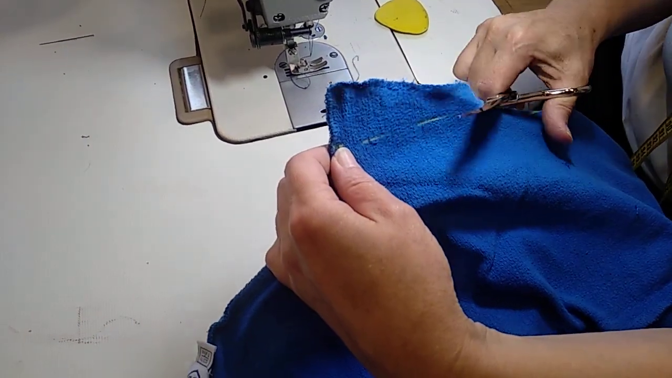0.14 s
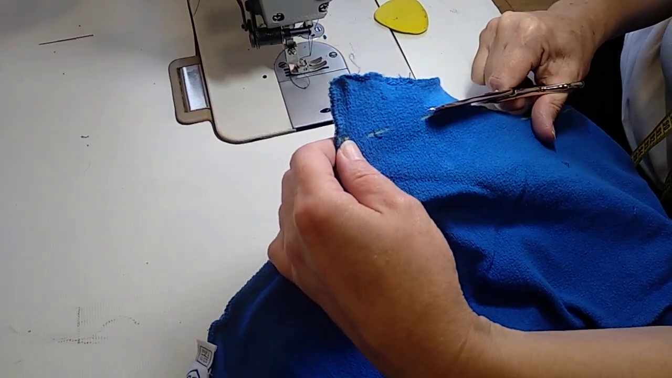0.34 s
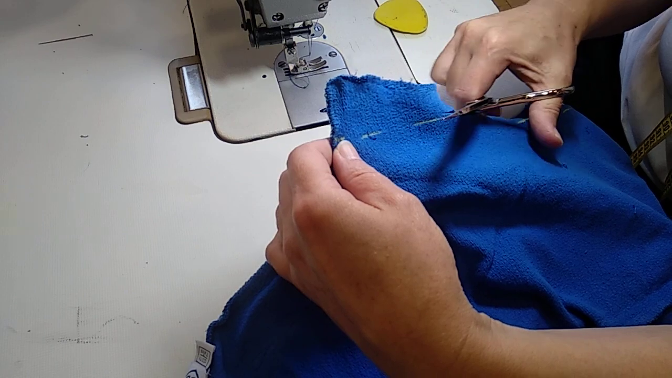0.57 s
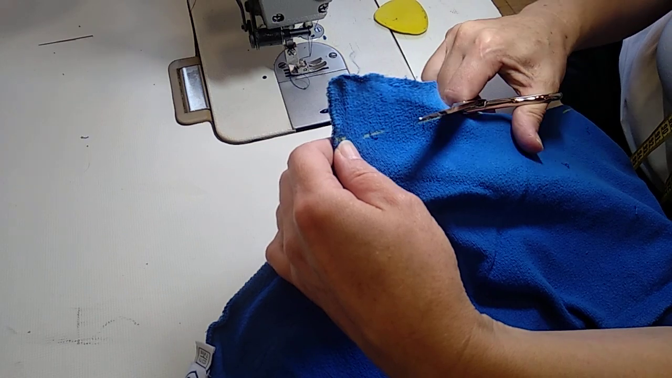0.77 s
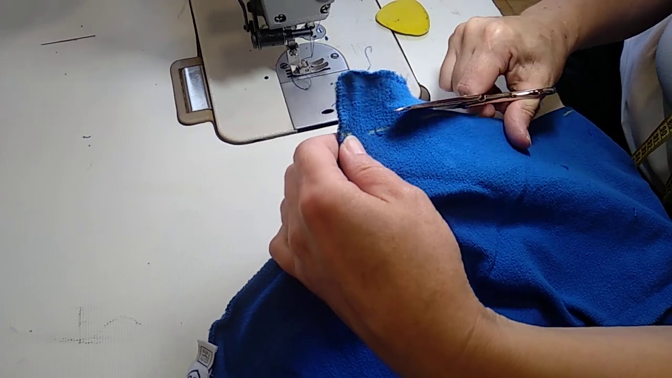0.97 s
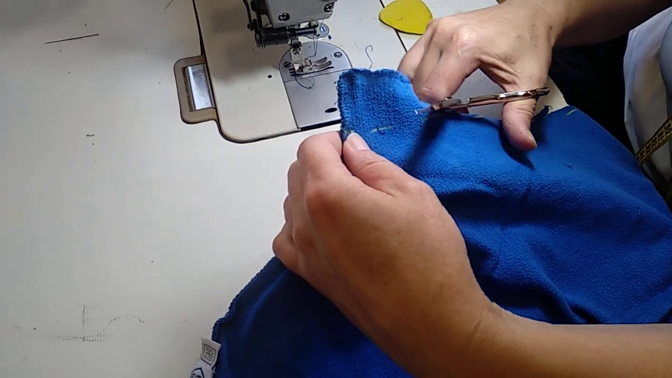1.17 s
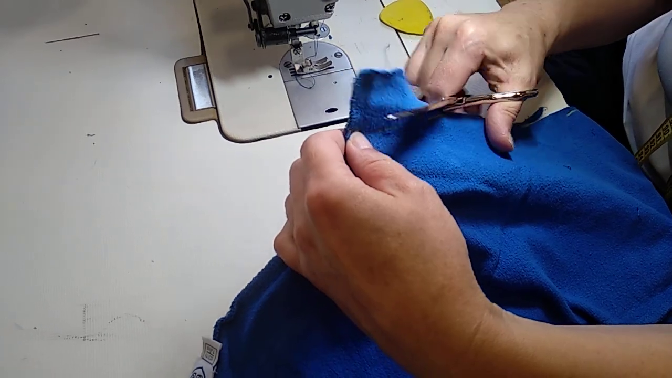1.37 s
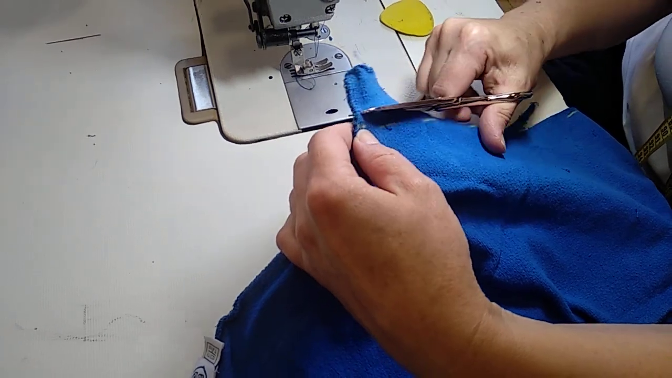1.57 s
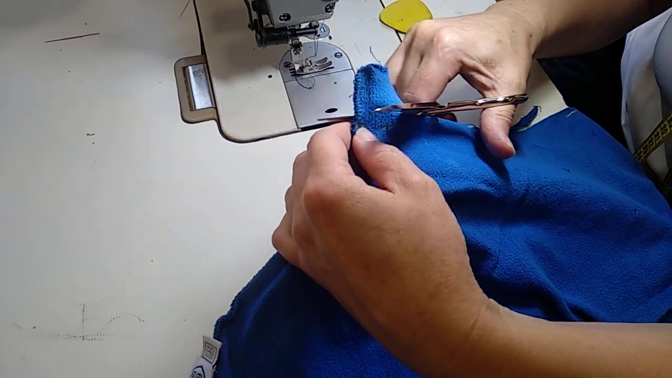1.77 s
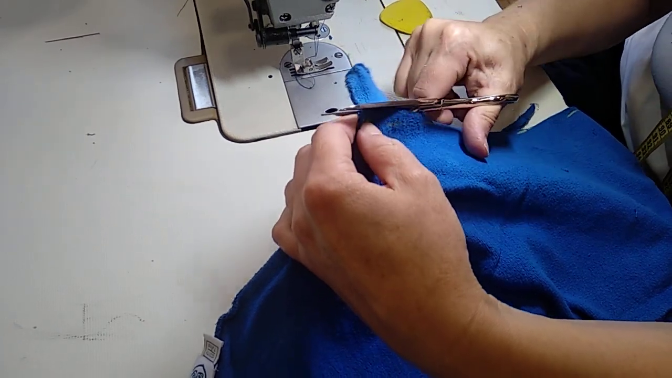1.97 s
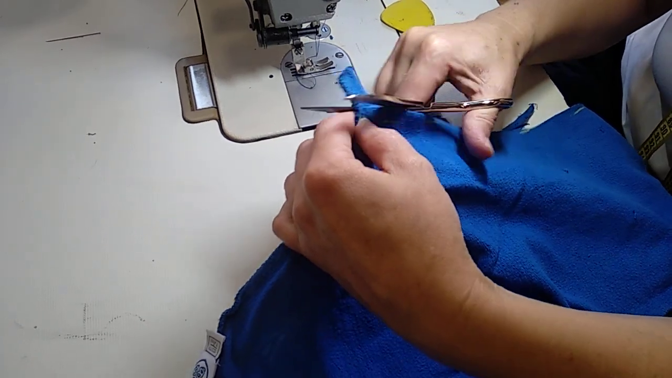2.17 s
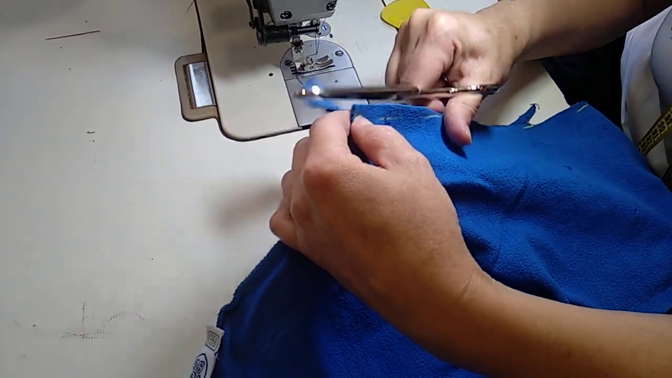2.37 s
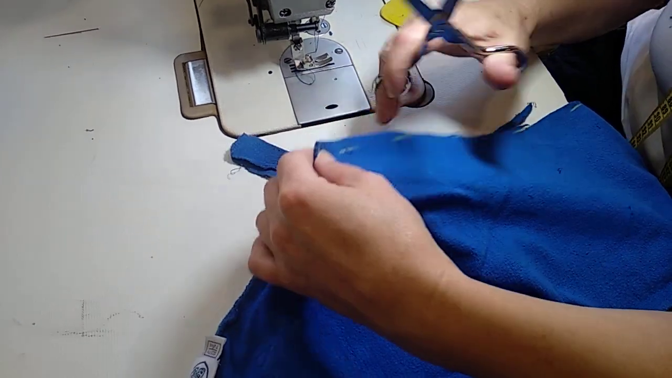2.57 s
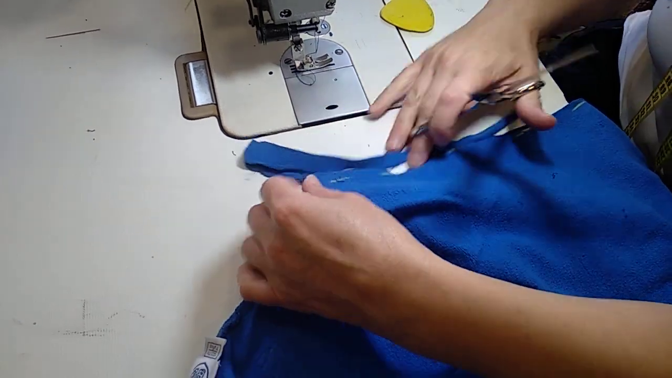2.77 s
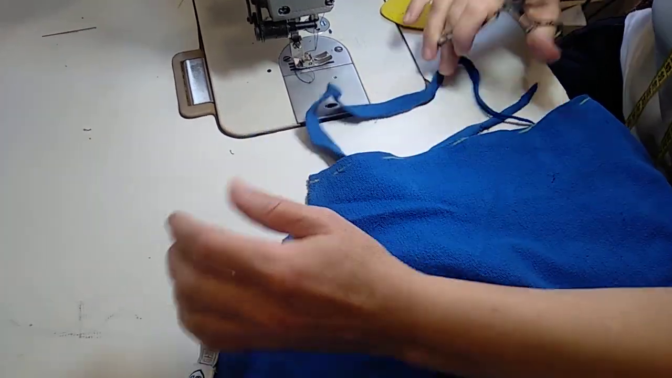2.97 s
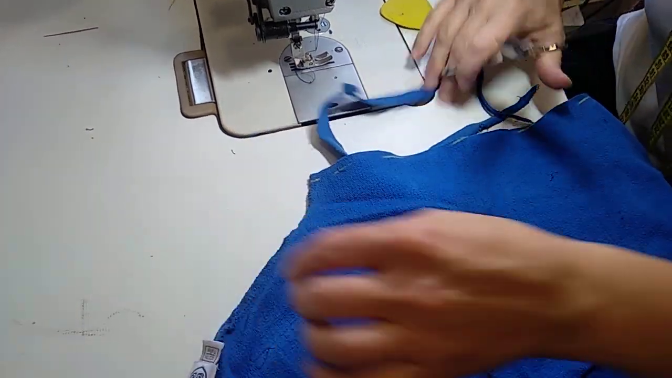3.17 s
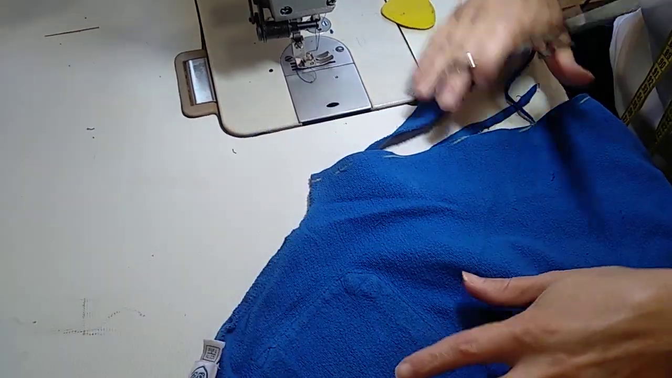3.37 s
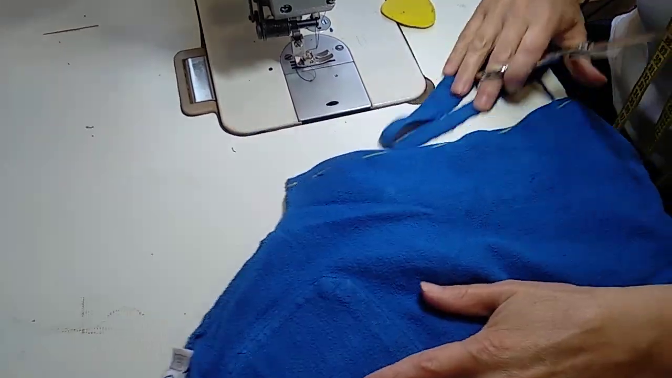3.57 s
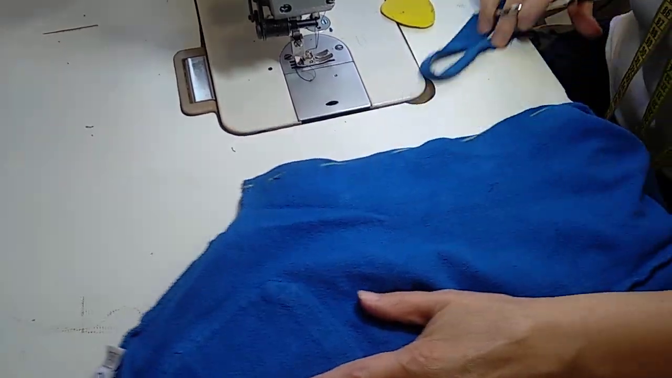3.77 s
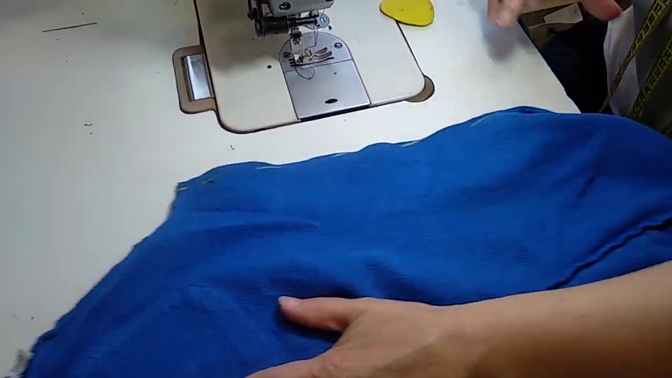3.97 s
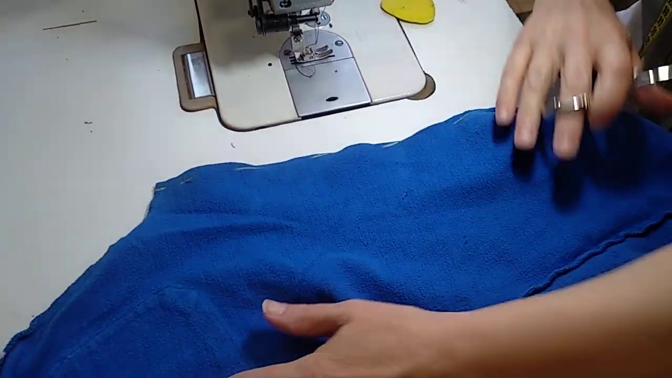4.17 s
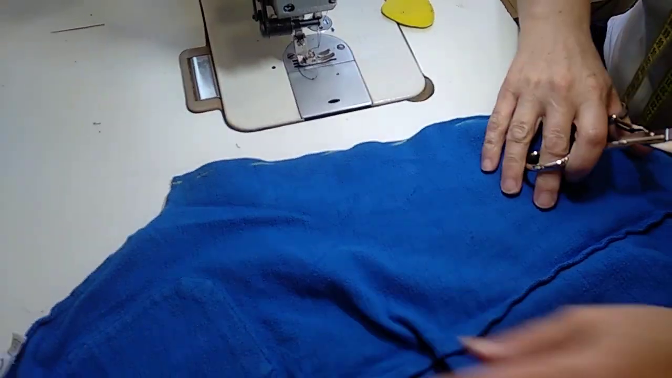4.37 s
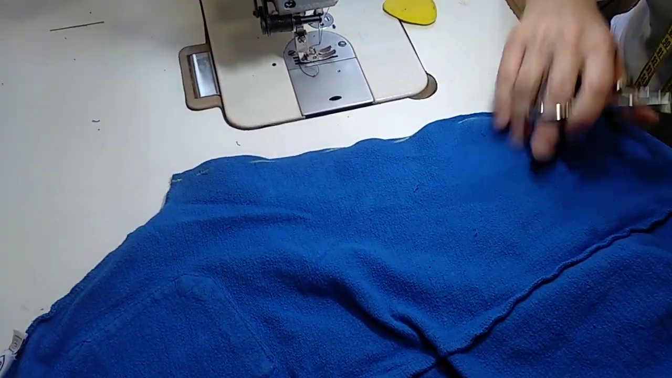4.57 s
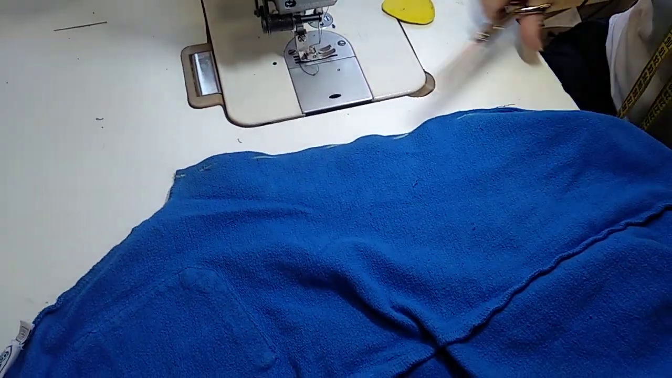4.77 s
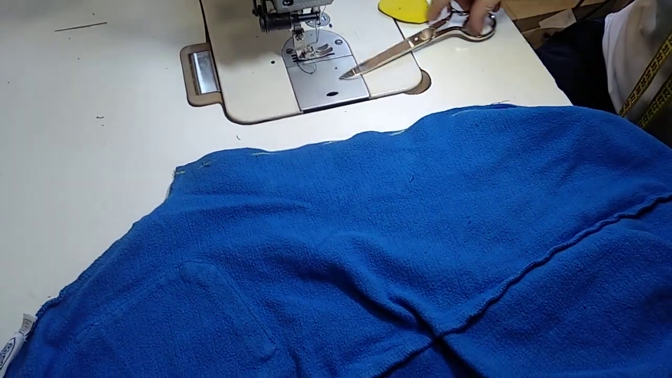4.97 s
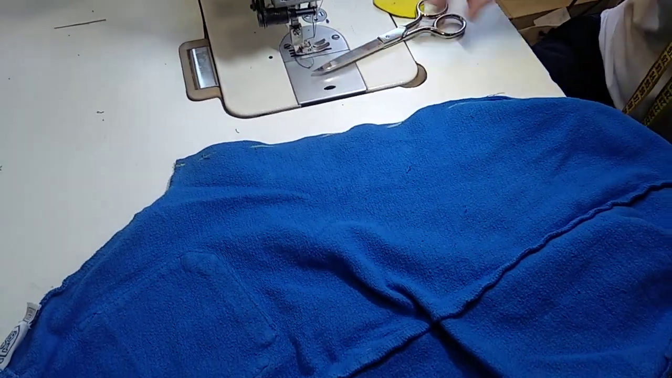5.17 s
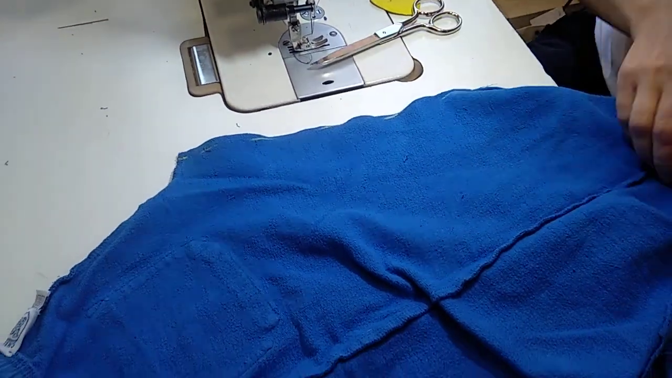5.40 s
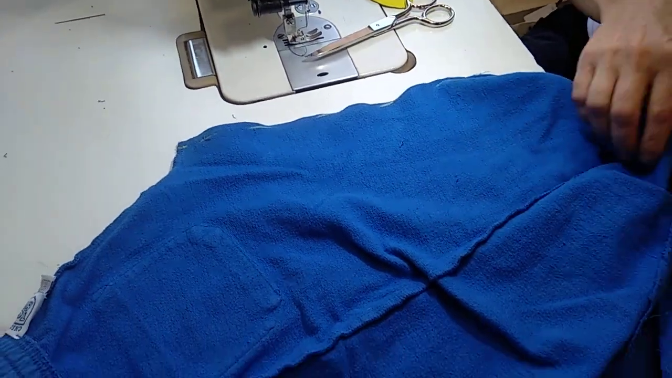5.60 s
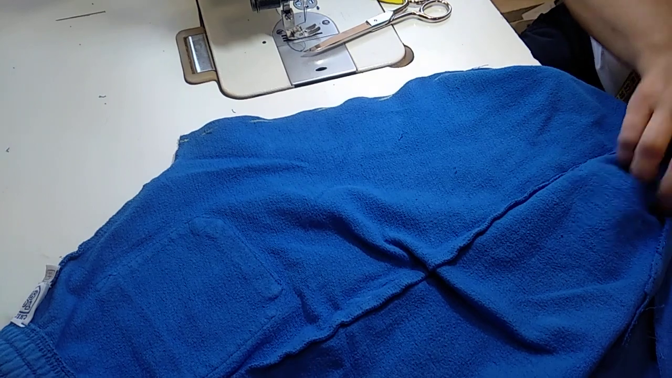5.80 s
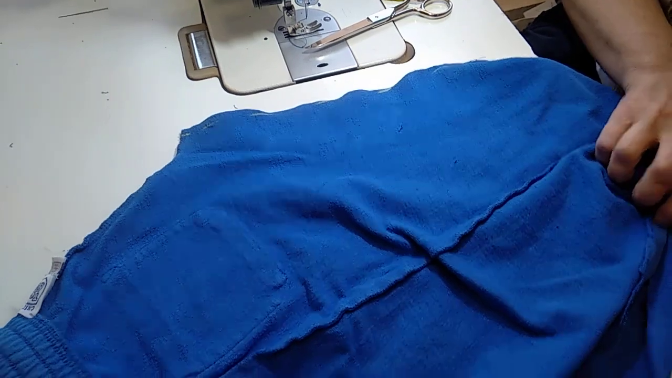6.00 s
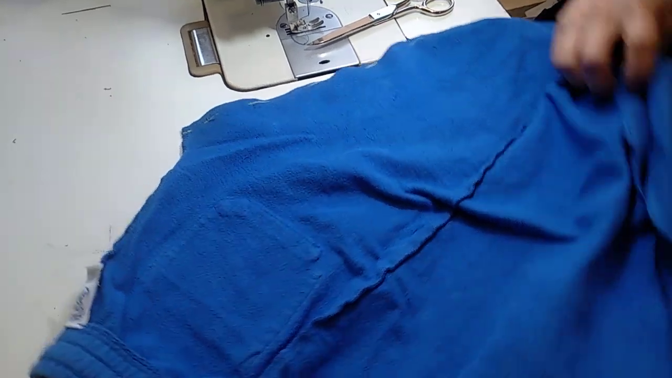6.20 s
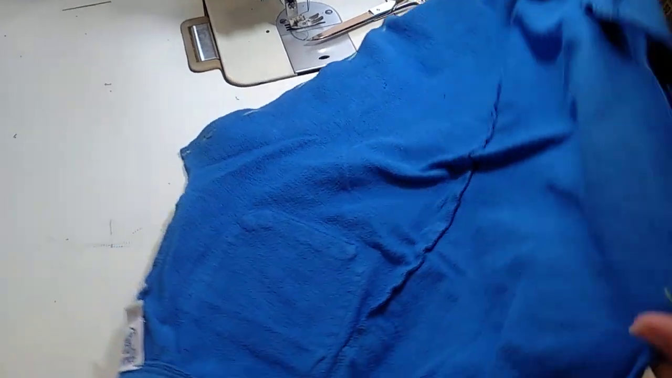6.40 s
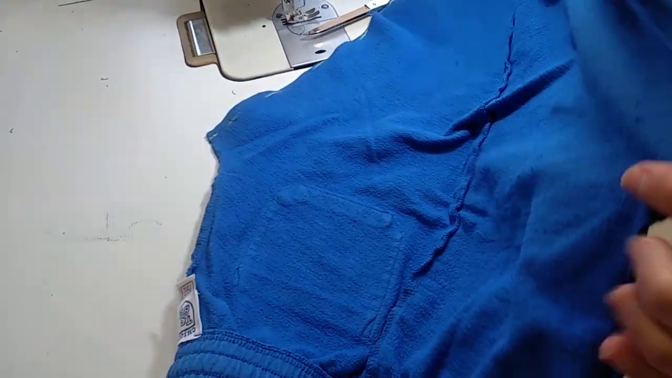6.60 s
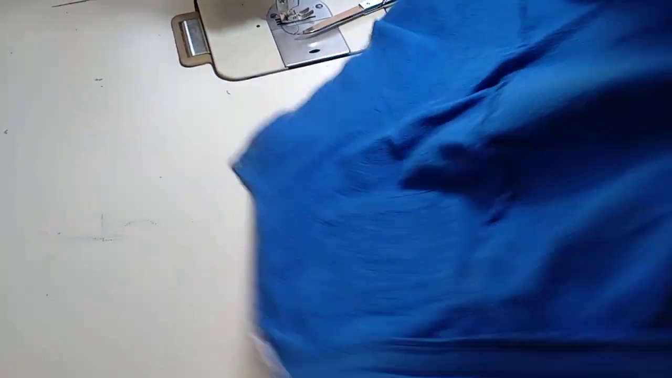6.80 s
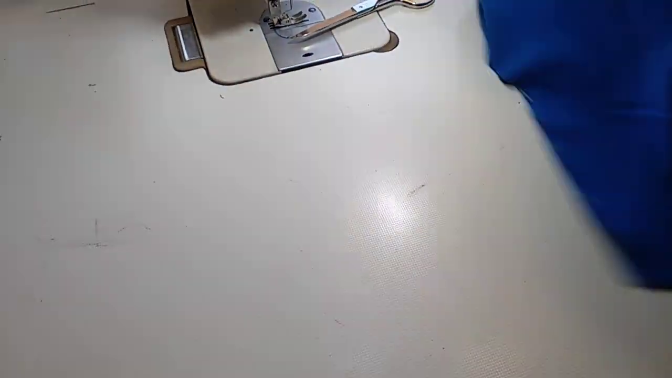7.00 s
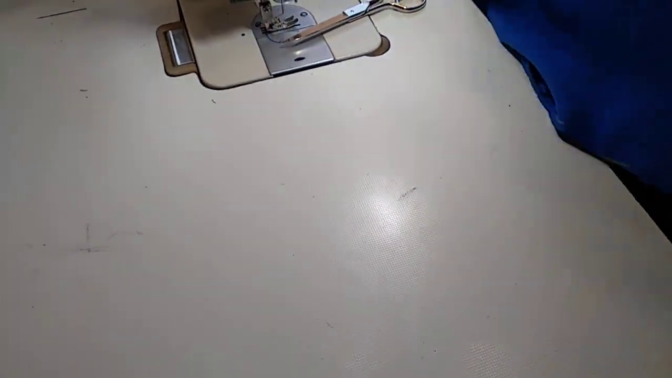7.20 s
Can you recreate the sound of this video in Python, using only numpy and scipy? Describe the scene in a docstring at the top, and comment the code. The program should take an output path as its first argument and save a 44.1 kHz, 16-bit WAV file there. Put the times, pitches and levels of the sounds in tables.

```python
"""A quiet workroom hums while small steel scissors cut a knitted edge in four crunchy strokes on a sewing table.
They click and snap; cloth slides and swishes, a hand thumps, and the scissors land and bounce on a bed plate.
Steel, plate and table are resonant modes driven by tiny impacts or noise; cloth and hum are noise in bands.
Two close microphone ports hear the treble apart and the middle alike; a faint room echo follows."""
import sys
import numpy as np
from scipy import signal
from scipy.io import wavfile

SR = 44100
rng = np.random.default_rng(int(sys.argv[2]) if len(sys.argv) > 2 else 0)


def master(y):
    """Save y as 16-bit WAV."""
    cut = np.clip(np.atleast_2d(y).T, -1, 1)
    pcm = np.round(cut * 32767)  # scale
    wavfile.write(sys.argv[1], SR, pcm.astype(np.int16))


N = 319708   # samples

# likeness of the two ports for near sources: (frequency [Hz], likeness setting, 1 = alike)
NEAR_ALIKE = [(100, 1), (1000, .999), (4000, .999), (5000, 0.2), (8000, 0.12), (15000, 0.085)]
# lean of near sources: (frequency [Hz], left minus right gain [dB])
NEAR_LEAN = [(100, 0), (600, 0), (3500, 0), (16000, -.3)]
NEAR_PORTS = (NEAR_ALIKE, NEAR_LEAN)
# scissors landing and bouncing on the bed plate: (onset [s], drive of tips [dB], place from pivot 0 to tip 1,
# drive of roots [dB], of shanks [dB], of handles [dB], of bed plate [dB], swell [s], t60 [s])
KNOCKS = [(4.921, -23, 1, -57.5, -38.5, -36, -40, 0.0074, 0.0097),
          (4.932, -29.5, 1, -60, -50, -46.5, -45, 0.0063, 0.065),
          (4.95, -41.5, 0.9, -59.5, -57.5, -51, -48.5, 0.007, 0.36),
          (5.035, -53.5, 0.85, -58.5, -49.5, -50.5, -47.5, 0.01, 0.69),
          (5.086, -25.5, 0.36, -37.5, -35.5, -30.5, -32.5, 0.013, 0.076),
          (5.114, -37.5, 0.72, -49, -59, -60.5, -54, 0.01, 0.044),
          (5.137, -50, 0.14, -47.5, -44.5, -38.5, -34, 0.0098, 0.13),
          (5.182, -56.5, 0.039, -52, -54, -40.5, -46, 0.0084, 0.054),
          (5.219, -65, 0.092, -66.5, -65, -54, -50.5, 0.013, .05),
          (5.248, -69.5, 0.29, -70.5, -69, -50.5, -46.5, 0.014, 0.13),
          (5.292, -97, 0.12, -87, -71, -56, -49, 0.0065, 0.15)]


def amp(db):
    """Logarithmic level: the amplitude gain of a level in dB."""
    return 10 ** (np.asarray(db) / 20)


def rms_one(x):
    """Power normalisation: scales a signal to rms 1."""
    return x / np.sqrt(np.mean(x ** 2) + 1e-20)


def at_hz(points, hz):
    """Interpolation along log frequency: reads a table at a given pitch."""
    table = np.array(points)
    return np.interp(np.log(hz), np.log(table[:, 0]), table[:, 1])


def waver(*speeds):
    """Random modulation: low-passed noise moves a gain; each speed is (rms spread [dB], corner rate [Hz])."""
    step, settle = 40, 2000   # samples between drift values; drift values dropped while the filter settles
    level_db = np.zeros(N // step + 2)
    for spread_db, rate_hz in speeds:
        r = np.exp(-2 * np.pi * rate_hz * step / SR)
        noise = rng.standard_normal(len(level_db) + settle)
        drift = signal.lfilter([1], [1, -2 * r, r * r], noise)[settle:]
        level_db += spread_db * rms_one(drift)
    return np.interp(np.arange(N) / step, np.arange(len(level_db)), amp(level_db))


def swells(starts, levels_db, swell_s, t60_s):
    """Onset and decay: each event swells as a bell curve and falls into a tail; one envelope per row of levels."""
    levels_db = np.atleast_2d(levels_db)
    lead_s = .04   # the bell is drawn from this long before the onset
    out = np.zeros((len(levels_db), N))
    for s, level_db, swell, t60 in zip(starts, levels_db.T, swell_s + 0 * starts, t60_s + 0 * starts):
        start = round((s - lead_s) * SR)
        t = np.arange(min(N - start, SR // 2)) / SR - lead_s - swell   # 0 at the peak
        bell = np.exp(-(t / swell) ** 2)
        tail = amp(-60 * np.maximum(t, 0) / t60)
        shape = np.where(t < 0, bell, .6 * bell + .4 * tail)
        out[:, start:start + len(t)] += amp(level_db)[:, None] * shape
    return out


def held(times, levels_db, rise_s, fall_s):
    """Sustained excitation: a gain passes through the levels, with bell-shaped flanks before and after."""
    t = np.arange(N) / SR
    before = np.maximum(times[0] - t, 0) / rise_s
    after = np.maximum(t - times[-1], 0) / fall_s
    return amp(np.interp(t, times, levels_db)) * np.exp(-(before + after) ** 2)


def spread(mid, side, ports, hz):
    """Mid-side stereo: shared and opposed signals mix to the likeness and lean set for this pitch."""
    alike_table, lean_table = ports
    alike = np.clip(at_hz(alike_table, hz), -1, 1)
    left_db = at_hz(lean_table, hz)
    mix = np.array([[1, 0.66], [1, -0.92]]) * np.sqrt([(1 + alike) / 2, (1 - alike) / 2])
    return mix * amp([[left_db / 2], [-left_db / 2]]) @ np.array([mid, side])


def banded_noise(spectrum, ports, band_gain, size=N):
    """Subband synthesis: half-octave noise bands, each with its level, likeness and gain in time; rms 1."""
    out, edges = 0, 25 * 2 ** np.arange(0, 9.6, .5)
    white = rng.standard_normal((2, 2, size))   # neighbouring bands get unrelated noise
    for k, (low, high) in enumerate(zip(edges, edges[1:])):
        hz = np.sqrt(low * high)
        if spectrum[0][0] / 1.5 < hz < spectrum[-1][0] * 1.5:
            band = signal.butter(2, [low, high], "band", fs=SR, output="sos")
            mid, side = signal.sosfilt(band, white[k % 2])
            out = out + amp(at_hz(spectrum, hz)) * band_gain(hz) * spread(mid, side, ports, hz)
    return rms_one(out)


def grains(per_s, uneven_db):
    """Shot noise: dense tiny impacts of uneven size, one train for mid and one for side; rms 1."""
    uneven = np.minimum(rng.exponential(1, (2, N)), 3)
    sizes = amp(uneven_db * uneven) * rng.standard_normal((2, N))
    return rms_one(sizes * (rng.random((2, N)) < per_s / SR))


def with_strikes(chatter, times, strike_db):
    """Impulsive excitation: adds one sharp push at each time."""
    out = chatter.copy()
    out[:, (times * SR).astype(int)] += amp(strike_db)
    return out


def resonate(push, modes, ports, wavering):
    """Modal superposition: pushes of wavering strength drive parallel two-pole resonators, scaled by noise power."""
    power = sum(np.pi * width / SR * amp(level_db) ** 2 for hz, width, level_db in modes)
    out = 0
    for k, (hz, width, level_db) in enumerate(modes):
        r, w = np.exp(-np.pi * width / SR), 2 * np.pi * hz / SR   # pole radius and angle
        gain = (-1) ** k * amp(level_db) / np.sqrt(power)   # neighbours in opposite sign
        b = np.array([1, 0, -1]) * (1 - r * r) / 2 * gain
        uneven_push = push * waver(wavering)[:push.shape[1]] + 1e-18
        mid, side = signal.lfilter(b, [1, -2 * r * np.cos(w), r * r], uneven_push)
        out = out + spread(mid, side, ports, hz)
    return out


def along(drives, place):
    """Contact position sets modal drive: interpolates each part's level between pivot (0) and tip (1)."""
    pivot_db, tip_db = np.array(drives)[:, :, None]
    return pivot_db + (tip_db - pivot_db) * place


def workroom_hum():
    """Stationary noise with room resonances: wavering bands, and a few low modes standing out."""
    # background spectrum: (frequency [Hz], relative density [dB])
    hum_spectrum = [(15, -87), (25, -46), (91, -47), (123, -4), (161, -8.5), (185, -8), (285, -4),
                    (394, -16.5), (714, -24), (817, -8.5), (1190, -59), (1560, -20.5), (2220, -45),
                    (5420, -37), (16000, -36)]
    # room resonances: (frequency [Hz], width [Hz], level [dB])
    drone_modes = [(186.5, 25, 1.5), (293, 12, 9), (296, 48, -16), (449.4, 62, -11), (641.6, 26, -5.5),
                   (855, 150, -11)]
    # port likeness: (frequency [Hz], likeness setting, 1 = alike)
    hum_alike = [(60, 1), (180, 0.83), (550, 0.87), (1650, 0.11), (4970, 0.1), (15000, 0.087)]
    # port lean: (frequency [Hz], left minus right gain [dB])
    hum_lean = [(60, -3.5), (150, -4), (380, -4.5), (950, -3.5), (2380, -1.5), (5980, -6), (15000, -6)]
    hum_db, drone_db = -66.5, -67.5
    ports = (hum_alike, hum_lean)
    broad = banded_noise(hum_spectrum, ports, lambda hz: waver((1.8, 8.0), (1.3, 1.2)))
    drone = resonate(rng.standard_normal((2, N)), drone_modes, ports, (2.5, 4.0))
    return amp(hum_db) * broad + amp(drone_db) * drone


def scissors():
    """Modal excitation: fibre and steel contacts drive blades, handles and plate, with a tone colour set in time."""
    # modes of each part: (frequency [Hz], width [Hz], level [dB])
    # blades, from tip towards pivot
    point_modes = [(14655, 80, 2.5), (15000, 200, -4), (15300, 47, 3.5), (15300, 120, 2), (15695, 80, 2.5)]
    tip_modes = [(12070, 370, -4.5), (12870, 70, 0.5), (11940, 64, 1), (12800, 80, 4.5), (13200, 100, 1),
                 (14200, 240, 0), (14200, 70, 5), (14600, 90, 3)]
    front_modes = [(10760, 540, -6), (10980, 160, 6), (11580, 260, -6)]
    belly_modes = [(9400, 210, -5.5), (10300, 310, 0.5)]
    shoulder_modes = [(7770, 140, -7), (8550, 90, 1), (8900, 100, 0.5)]
    middle_modes = [(6930, 120, -17), (7286, 110, 4.5), (8100, 170, -2.5)]
    rasp_modes = [(5790, 80, 0.5), (5900, 37, 1), (5950, 90, -7)]
    # around the pivot
    screw_modes = [(4990, 67, -2.5), (5180, 60, 2), (5345, 70, 0)]
    collar_modes = [(4720, 130, 1), (5120, 140, -5.5)]
    rivet_modes = [(4160, 20, -6), (4160, 96, 0.5)]
    root_modes = [(3453, 22, -0.5), (3664, 28, -0.5), (3760, 68, 2)]
    heel_modes = [(2585, 120, 0), (2806, 190, -2)]
    # shanks and handles
    shank_modes = [(1945, 320, -3), (2120, 50, 0.5), (2250, 45, 1), (2374, 110, -4)]
    neck_modes = [(1630, 270, -3), (1746, 50, 1.5)]
    loop_modes = [(1086, 47, -3), (1167, 60, 1), (1272, 110, 1.5), (1460, 61, -7)]
    handle_modes = [(658.8, 16, 0.5), (872.6, 66, 5.7), (975, 88, 1)]
    # the bed plate
    bed_modes = [(181, 22, -6), (255, 20, -0.5), (306.2, 39, 9), (351, 61, 1.5), (425, 40, -4.5),
                 (500, 55, -9), (593, 10, -5), (622, 90, -9.5), (747, 80, -11.5)]
    # the parting fabric itself, broad and dull
    knit_modes = [(600, 480, -0.5), (1120, 520, 1.5), (1680, 810, -3), (2350, 820, -4)]
    # tone colour of the steel in each stretch of time: (from [s], pitch factor of middles, then extra level [dB] of
    # fronts, bellies, shoulders, rasp, screw, collar, points, heels, roots, rivet, loops, necks)
    colours = [(0, 0.99, 8, 0.5, -4, -2, -23, -3.5, -5, 0, -13, -12, -6, 5),
               (.4, 1.01, 3.5, -0.5, 1, 1.5, -21, -4, -5, 0.5, -16, -10, -3, 2),
               (1.2, 1.01, 3.5, 1, 1, 0.5, -10, -1, -5, 1.5, -19, -11, -5, -3),
               (1.8, 0.98, 3.5, 3, -4.5, 5, -42, -0.5, -7, 2, -20.5, -6, -5.5, -8),
               (2.2, 0.965, -11, 1.5, -14, -2, -30, 6.5, -6, -1.5, -6, -8, 3, -7),
               (2.42, 0.98, -6, 0, -8, 2, -3, -11, -7, -2.5, -14, -5, 2, 2),
               (4.4, 1.008, 0, -3.5, 2, 4, -5, -2.5, 0, -5.5, -4.5, -0.5, -5, 1),
               (4.849, 1.01, 2.5, 0, 2.5, 1, -3, -2, 1.5, -2.5, 0, -8.5, -14, -10.5),
               (5.021, 0.98, -3.5, 0, -1, -0.5, -4.5, -2.5, -0.5, 3.5, -7.5, -8.5, -0.5, -5.5),
               (5.07, 1.03, -1, -2.5, -0.5, -3, 5.5, -5, -1.5, -4.5, -7.5, -11, -8, -2.5),
               (5.125, 1.01, -2.5, -1, 0, -5, 6, -3, 1, -4.5, -8, -8, -2.5, -3),
               (5.17, 1.01, -7, -2, -4, 1, 9.5, 1, -7, 0, -24, -17, -10, 3.5),
               (5.205, 1.033, -3, -4, -1, -2, 3, 1, -12, 4, -23, -5, -3.5, 5.5)]
    # the cut catches and slips: (spread [dB], rate [Hz])
    crunch = (0.54, 150)
    knit_db = -4.5   # against the handles' drive under the cut
    strike_db, strike_lead_s = 24, .004   # one hard push per landing, just before the chatter is loudest
    heavy_hz = 6500   # only parts whose first mode lies below this feel the push
    uneven = (1.5, 14)   # wavering of each mode's push: (spread [dB], rate [Hz])

    cut = cutting() * waver(crunch)
    tips, fronts, middles, rasp, roots, shanks, handles, bed = cut + clicking() + knocking()
    from_s, pitch, *extra_db = np.transpose(colours)
    stretch = np.searchsorted(from_s, np.arange(N) / SR, "right").clip(1) - 1
    # in the order of the extra levels in the colours
    shifted = [(front_modes, fronts), (belly_modes, fronts), (shoulder_modes, middles), (rasp_modes, rasp),
               (screw_modes, roots), (collar_modes, roots), (point_modes, tips), (heel_modes, roots),
               (root_modes, roots), (rivet_modes, roots), (loop_modes, handles), (neck_modes, shanks)]
    colour_gains = amp(extra_db)[:, stretch]
    parts = [(modes, drive * gain) for (modes, drive), gain in zip(shifted, colour_gains)]
    parts += [(tip_modes, tips), (shank_modes, shanks), (handle_modes, handles), (bed_modes, bed)]
    parts += [(knit_modes, cut[6] * amp(knit_db))]

    landings = np.array(KNOCKS)
    loudest_s = landings[:, 0] + landings[:, -2]   # onset plus swell
    impacts = grains(per_s=15000, uneven_db=2.2)
    struck = with_strikes(impacts, loudest_s - strike_lead_s, strike_db)
    out = 0
    for modes, drive in parts:
        push = struck if modes[0][0] < heavy_hz else impacts
        out = out + resonate(push * drive, modes, NEAR_PORTS, uneven)

    # the middles change pitch with each stretch, which sounds them for at most its first second
    for k, factor in enumerate(pitch):
        bent = [(hz * factor, width, level_db) for hz, width, level_db in middle_modes]
        start = np.argmax(stretch == k)
        push = (impacts * middles * (stretch == k))[:, start:start + SR]
        out[:, start:start + SR] += resonate(push, bent, NEAR_PORTS, uneven)
    return out


def cutting():
    """Moving contact: the cut runs from pivot to tip in each stroke, and yarns part where it stands."""
    # closing strokes: (start [s], hardest [s], end [s], drive of tips at these moments [dB] x 3,
    # extra of middles [dB], of rasp [dB], of roots [dB], of shanks [dB], of handles [dB])
    strokes = [(0.142, 0.232, 0.335, -72, -61, -68, -2.5, -5, -1, 3.3, -0.18),
               (0.774, 0.866, 0.935, -68.5, -58, -71.5, -6.5, 1.5, -1.7, 1.9, -0.24),
               (1.354, 1.465, 1.52, -69, -62.5, -72, -4.5, 1.5, 1.5, 2.2, -1.2),
               (1.902, 1.953, 2.015, -72.5, -61.5, -61.5, 2, -7, 0.19, 2.3, -1.1)]
    # bundles of yarn parting: (onset [s], drive of tips [dB], swell [s])
    yarns = [(0.1375, -77, 0.0049), (0.1785, -62.5, 0.0083), (0.212, -56, .007), (0.226, -56, 0.0059),
             (0.236, -60, 0.0037), (0.243, -47.5, 0.0036), (0.253, -49.5, 0.0026), (0.285, -60, 0.004),
             (0.315, -59, 0.0046), (0.764, -79, 0.0018), (0.8235, -71, 0.0053), (0.853, -59, 0.0028),
             (0.867, -59, 0.0029), (0.895, -65, 0.0067), (1.366, -73, 0.0072), (1.384, -64, 0.0063),
             (1.402, -61, .004), (1.426, -55.5, 0.015), (1.486, -61, 0.0055), (1.9, -69, 0.0026),
             (1.9264, -56.5, 0.015), (1.965, -57, 0.0089)]
    # drive against the tips, a row at the pivot and a row at the tip:
    # (fronts [dB], middles [dB], rasp [dB], roots [dB], shanks [dB], handles [dB])
    stroke_drives = [(-3.5, 7, 2.5, -5, -24, -2), (-9, -8, -20.5, -23.5, -29, -9)]
    # the same columns for parting yarn
    yarn_drives = [(-4, 1.5, -4, -48, -30, -7), (-6, -25, -17, -9, -33, -18)]
    bite_s, let_go_s, yarn_t60_s = 0.01, 0.0038, 0.027
    t, effort = np.arange(N) / SR, np.zeros((8, N))   # the eighth row, the bed plate, stays silent
    for start, hardest, end, *levels_db in strokes:
        extra_db = np.array([0, 0, *levels_db[3:]])[:, None]   # none for tips and fronts
        place = np.clip((t - start) / (end - start), 0, 1)
        shear = held([start, hardest, end], levels_db[:3], bite_s, let_go_s)
        shear_db = np.vstack([0 * t, along(stroke_drives, place)]) + extra_db
        effort[:7] += shear * amp(shear_db)
        s, peak_db, swell = np.transpose([row for row in yarns if start - .05 < row[0] < end])
        yarn_place = np.interp(s, t, place)
        parts_db = np.vstack([0 * s, along(yarn_drives, yarn_place)]) + extra_db
        effort[:7] += swells(s, peak_db + parts_db, swell, yarn_t60_s)
    return effort


def clicking():
    """Impact of steel on steel: the blades are driven at the contact; roots, shanks and handles are jolted."""
    # blades rubbing, opening and snapping shut: (onset [s], drive of tips [dB], place from pivot 0 to tip 1,
    # roots against tips [dB], shanks against tips [dB], swell [s], t60 [s])
    clicks = [(0.457, -75.5, .1, -9, -30, 0.017, 0.071), (1.043, -73.5, 0.19, -10, -11, 0.019, 0.098),
              (1.649, -73.5, 0.52, -15, -19, 0.018, 0.13), (2.127, -72, 0.37, -7, -8, 0.028, 0.24),
              (2.225, -78, .1, -16, -25, 0.023, .09), (2.285, -59.5, 0.22, -16, -19, 0.011, .09),
              (2.303, -41.5, 0.48, -18.5, -35, 0.0099, 0.044),
              (2.316, -39.5, 0.43, -19.5, -36, 0.0034, 0.043),
              (2.444, -57.5, 0.5, -15.5, -24.5, 0.017, 0.26), (2.495, -76, 0.079, -24, -21, 0.02, .11),
              (2.513, -65, 0.15, -12, -12, 0.015, .06), (2.932, -67, 0.36, -10.5, -19, 0.0098, .04),
              (4.5, -76.5, 0.77, -25, -24, .012, .06), (4.569, -81, 0.36, -5, 7.5, 0.014, .14),
              (4.616, -65, 0.058, -18, -18, 0.0025, 0.15), (4.634, -43.5, 0.55, -21, -36, 0.0086, .07),
              (4.65, -37, 0.76, -22, -34.5, 0.0077, 0.11), (4.69, -65.5, 0.53, -18, -35, 0.034, 0.28)]
    # drive against the tips, a row at the pivot and a row at the tip: (fronts [dB], middles [dB], rasp [dB])
    click_drives = [(3, 5, -8.5), (-14, -10.5, -44)]
    handles_db, bed_db = 2, -31.5   # handles against the shanks, bed plate against the tips
    s, peak_db, place, roots_db, shanks_db, swell, t60 = np.transpose(clicks)
    parts_db = np.vstack([0 * s, along(click_drives, place), roots_db, shanks_db,
                          shanks_db + handles_db, bed_db + 0 * s])
    return swells(s, peak_db + parts_db, swell, t60)


def cloth():
    """Friction noise: sliding knit gives a soft bright hiss with a duller rustle under it, both a little patchy."""
    # sliding on cloth and table: (first [s], last [s], hiss at first [dB], hiss at last [dB], rise [s], fall [s],
    # rustle against hiss [dB]); where last precedes first, the flanks overlap
    slides_table = [(2.704, 2.875, -71, -63, 0.038, 0.048, -15), (3.118, 3.08, -71, -65, 0.016, 0.066, -12),
                    (3.408, 3.34, -74, -65.5, 0.034, 0.12, -11), (3.6, 3.96, -60, -60.5, 0.13, 0.15, -18),
                    (3.69, 3.72, -86, -82, 0.049, 0.045, -16.5),
                    (4.206, 4.205, -68, -67.5, 0.03, 0.038, -21), (4.71, 3.8, -90, -72, .03, 0.092, -11),
                    (5.422, 5.45, -67, -68.5, 0.045, 0.062, -13),
                    (5.595, 5.62, -73, -68.5, 0.064, 0.022, -37),
                    (5.943, 6.33, -73, -69, 0.089, 0.084, -6.5), (6.44, 6.56, -69, -71.5, 0.1, 0.05, -23),
                    (6.55, 6.68, -68.5, -70, 0.027, 0.11, -18), (7.045, 7.13, -72, -70, 0.19, 0.13, -8.5)]
    # short bright swishes of cloth, and the slap of the hand at 5.9 s: (onset [s], peak [dB], swell [s])
    swishes_table = [(2.55, -78, 0.013), (2.933, -84.5, 0.0086), (3.0844, -69, 0.013),
                     (3.1494, -65.5, 0.024), (3.4052, -65.5, 0.015), (4.5, -71, 0.015), (4.6, -61, 0.044),
                     (5.909, -61.5, 0.0061), (6.038, -67, 0.011), (6.268, -56.5, 0.033),
                     (6.5285, -71, 0.012), (6.721, -73, 0.011)]
    # bright spectrum: (frequency [Hz], relative density [dB])
    hiss_spectrum = [(2060, -57.5), (3500, 6.5), (3680, -50), (5030, -6), (6690, -3.5), (7550, 1),
                     (9370, -2), (12400, 5), (16000, -0.5)]
    # dull spectrum: (frequency [Hz], relative density [dB])
    rustle_spectrum = [(600, -14.5), (1000, 5.5), (1300, -0.5), (1650, 4), (2000, 1.5), (2400, 6.5),
                       (3000, -8), (4500, -17)]
    # port likeness: (frequency [Hz], likeness setting, 1 = alike)
    cloth_alike = [(60, 0.69), (180, 0.73), (550, 0.29), (1650, 1), (4970, 0.56), (15000, 0.016)]
    # port lean: (frequency [Hz], left minus right gain [dB])
    cloth_lean = [(60, -4.5), (150, -6.0), (380, 7), (950, -5), (2380, -1), (5980, -1.5), (15000, -3.5)]
    # sliding cloth catches and lets go: (spread [dB], rate [Hz])
    drag = (0.59, 9.5)
    swish_t60_s = 0.073
    rest_db = -82.5   # rustle of cloth that is never quite still
    ports = (cloth_alike, cloth_lean)
    slides = np.array([held(row[:2], row[2:4], *row[4:6]) for row in slides_table]) * waver(drag)
    s, peak_db, swell = np.transpose(swishes_table)
    swishes = swells(s, peak_db, swell, swish_t60_s)[0]
    hiss_gain = slides.sum(axis=0) + swishes
    rustle_gain = amp(np.array(slides_table)[:, 6]) @ slides + amp(rest_db)
    hiss = banded_noise(hiss_spectrum, ports, lambda hz: waver((1.5, 20)))
    rustle = banded_noise(rustle_spectrum, ports, lambda hz: waver((2.2, 15)))
    return hiss_gain * hiss + rustle_gain * rustle


def thumps():
    """Soft impact: flesh on the table top sends a push and a puff of noise into its low modes."""
    # a hand meets the table top: (onset [s], drive [dB])
    thumps_table = [(2.819, -58), (5.899, -50.5), (5.935, -58.5)]
    # modes of the table: (frequency [Hz], width [Hz], level [dB])
    table_modes = [(237, 40, 5), (333, 70, -1), (450, 42, 5), (552, 63, -6.5), (618, 51, -11),
                   (870, 110, -8.5), (1640, 240, -23)]
    swell_s, t60_s, strike_db = 0.00799, 0.085, 23   # strike against the noise around it
    s, drive_db = np.transpose(thumps_table)
    push = with_strikes(rng.standard_normal((2, N)), s + swell_s, strike_db)
    drive = swells(s, drive_db, swell_s, t60_s)[0]
    return resonate(push * drive, table_modes, NEAR_PORTS, (1, 10))


def knocking():
    """Repeated impact: each landing drives blades, handles and bed plate together."""
    # drive against the tips, a row at the pivot and a row at the tip: (fronts [dB], middles [dB], rasp [dB])
    knock_drives = [(-5, 0.5, 8), (-8, -11, -27.5)]
    s, peak_db, place, *lower_db, swell, t60 = np.transpose(KNOCKS)
    parts_db = np.vstack([peak_db, peak_db + along(knock_drives, place), *lower_db])
    return swells(s, parts_db, swell, t60)


def room(x):
    """Reverberation: convolution with noise that decays at its own rate in each band."""
    # decay time: (frequency [Hz], t60 [s])
    decay_times = [(150, 0.82), (700, 0.35), (2000, 0.25), (6000, 0.44), (15000, 0.1)]
    # echo colour: (frequency [Hz], relative density [dB])
    echo_colour = [(100, 3), (300, -2.5), (700, -0.5), (1200, -3.5), (2500, -3.5), (4500, -9.5),
                   (7500, -8.5), (11000, -12.5), (16000, -10)]
    t = np.arange(SR // 2 + SR // 5) / SR

    def decay(hz):
        """Exponential decay, silent for the first 6 ms."""
        return amp(-60 * t / at_hz(decay_times, hz)) * (t > .006)

    echo = banded_noise(echo_colour, NEAR_PORTS, decay, size=len(t))
    mono = x.mean(axis=0)[None]
    return signal.fftconvolve(mono, echo / np.sqrt(len(t)), axes=1)[:, :N]


def scene():
    """Superposition: all sources add at the two ports, the near ones with their echo."""
    room_db = -14.5
    near = scissors() + thumps()
    return near + amp(room_db) * room(near) + cloth() + workroom_hum()


def record(dry):
    """Band limitation: the small microphone loses most of the deep bass, and the top is cut."""
    low_hz, cutoff_hz, bass_share = 96, 16180, .25
    high_pass = signal.butter(4, low_hz, "high", fs=SR, output="sos")
    thin = bass_share * dry + signal.sosfilt(high_pass, dry)
    top_cut = signal.cheby2(24, 80, cutoff_hz, fs=SR, output="sos")   # 80 dB down from the cutoff upwards
    return signal.sosfilt(top_cut, thin)


dry = scene()
out = record(dry)
master(out)
```